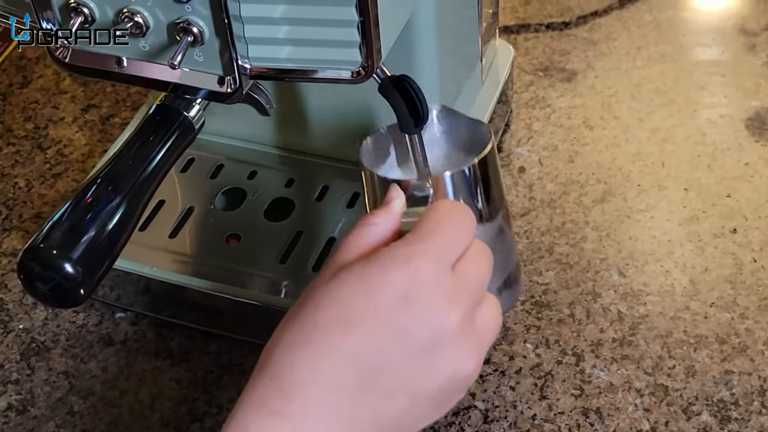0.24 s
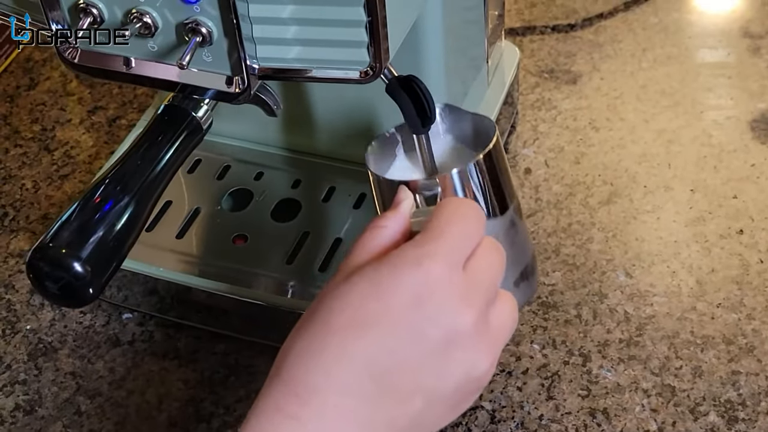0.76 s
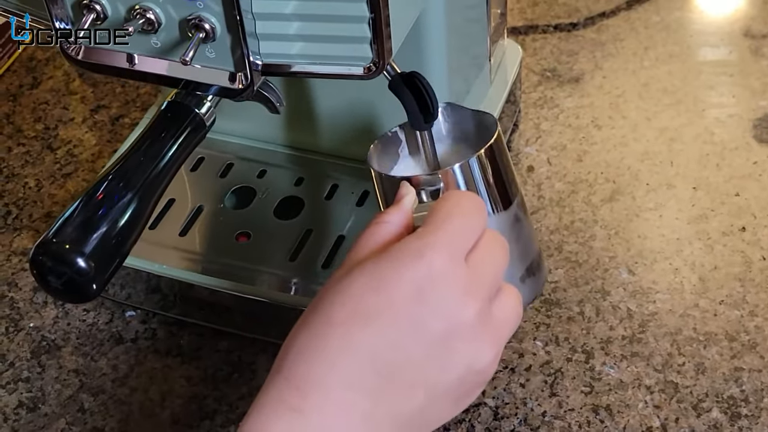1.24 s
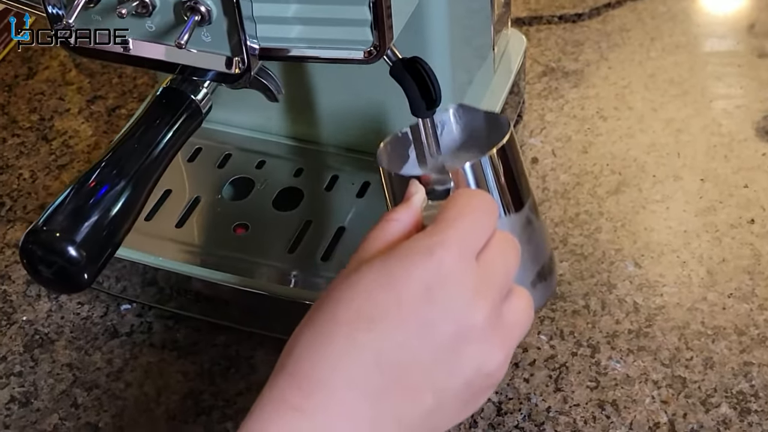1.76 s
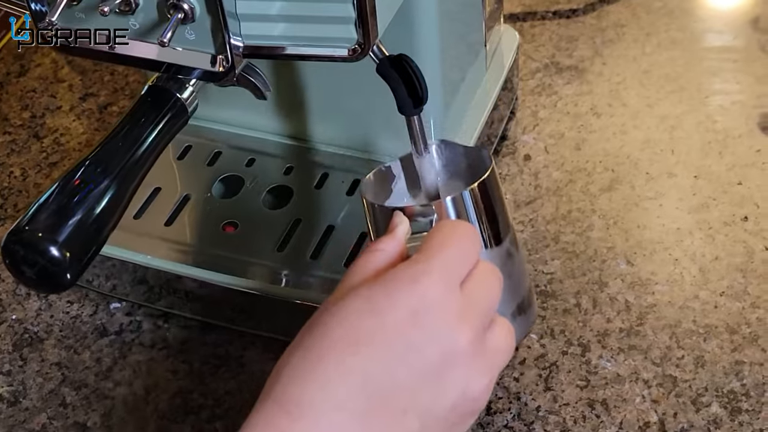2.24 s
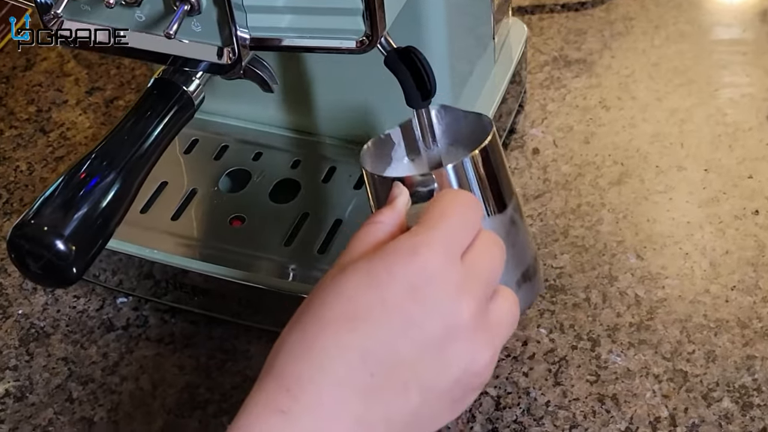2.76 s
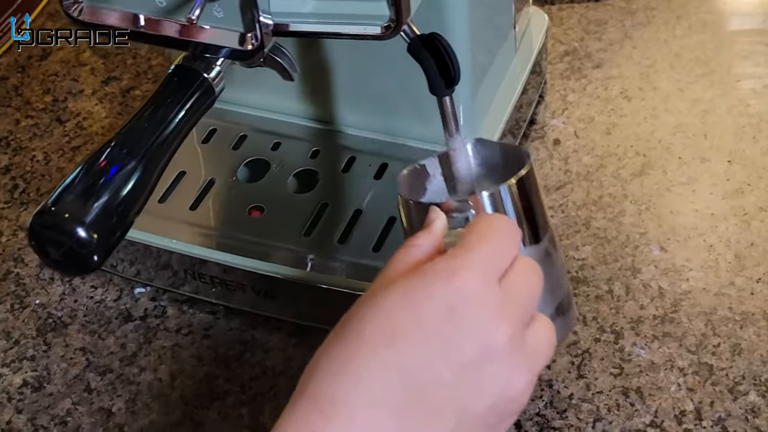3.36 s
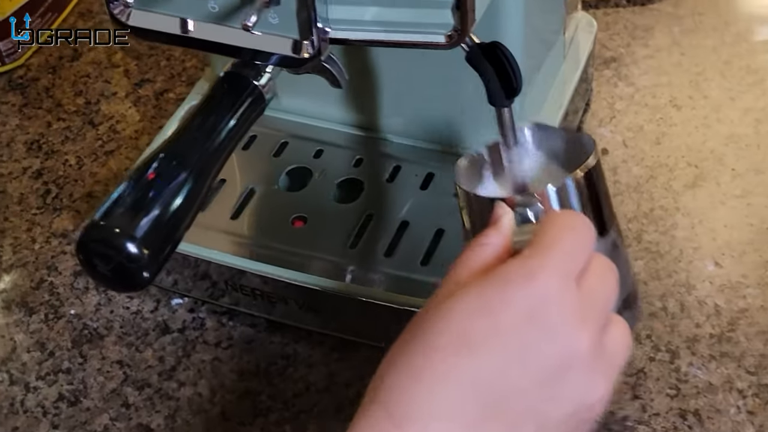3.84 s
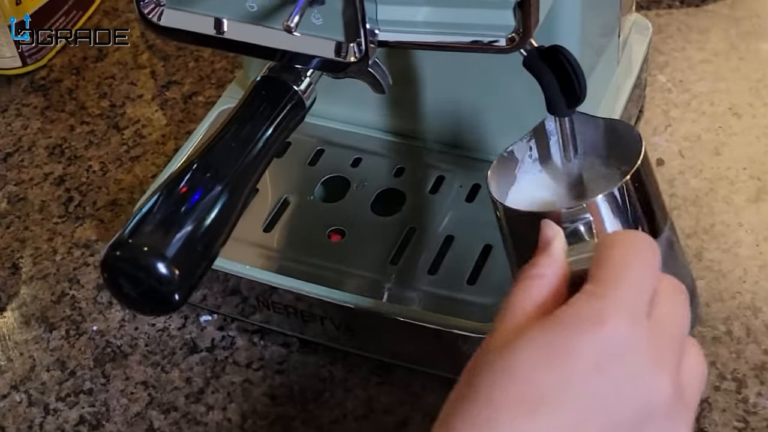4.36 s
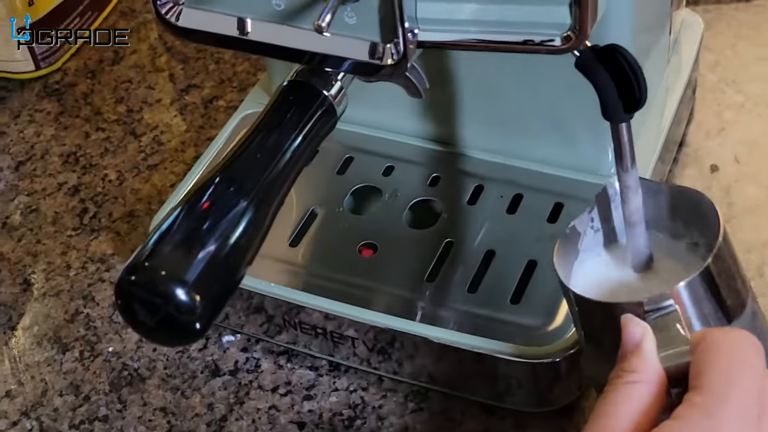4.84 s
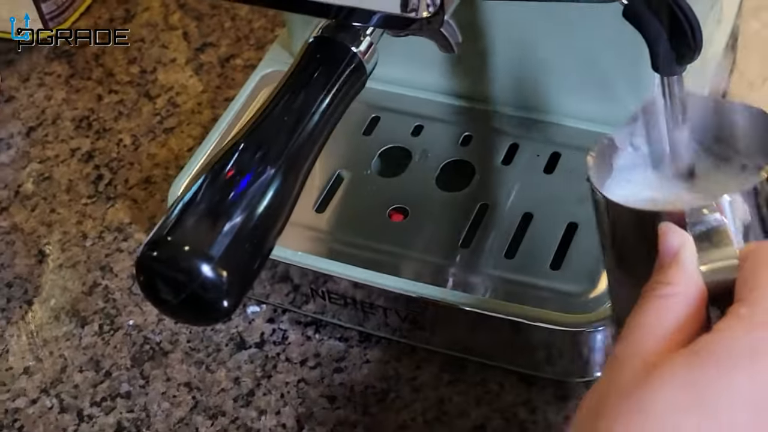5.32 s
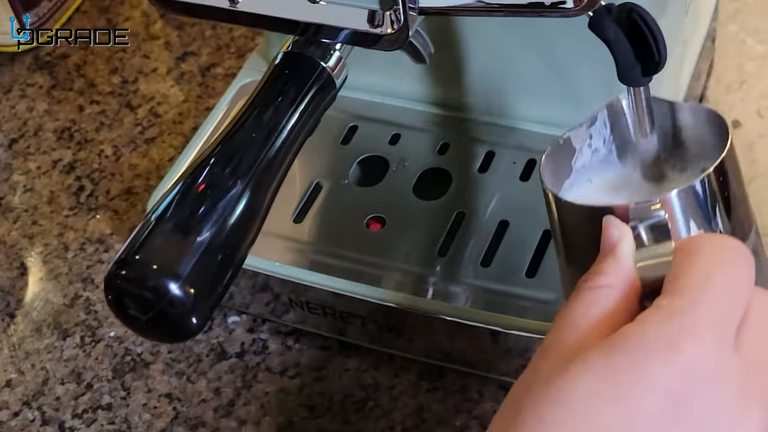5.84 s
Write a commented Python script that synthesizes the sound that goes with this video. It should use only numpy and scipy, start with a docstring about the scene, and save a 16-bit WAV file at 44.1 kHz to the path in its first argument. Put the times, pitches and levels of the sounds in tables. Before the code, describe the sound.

Close, rough squealing and fizzing of steam heating milk in steel, with regular low pump burrs, a late bright airy spurt and bubbling, rising gurgles.

```python
"""Close to a stereo microphone on a kitchen counter, a steam wand heats milk in a steel pitcher.
From the start, collapsing steam bubbles ring the pitcher (squeal) and hiss as coloured noise (fizz).
A hum (a sine) lies beneath; the pump burrs every three quarters of a second, and struck modes make knocks.
Near the end the tip comes out of the milk: jet noise in bright puffs, with a sputter from the surface.
Then it dips back and gurgles in the froth: swooping resonances, rising bubbles and climbing tones."""
import sys
import numpy as np
from scipy import signal
from scipy.fft import rfft, irfft
from scipy.io import wavfile

SR = 44100
rng = np.random.default_rng(int(sys.argv[2]) if len(sys.argv) > 2 else 0)


def transcribe(signal):
    """Save signal, clipped to [-1, 1], as a 16-bit WAV file at the path in sys.argv[1]."""
    frames = np.atleast_2d(signal).T
    limited = np.clip(frames, -1, 1)
    pcm = np.round(limited * 32767).astype(np.int16)
    wavfile.write(sys.argv[1], SR, pcm)


N = 268392
TIME = np.arange(N) / SR  # s
FRAME, HOP = 2048, 512  # samples
HZ = np.fft.rfftfreq(FRAME, 1 / SR)
FRAME_TIME = np.arange(-(-N // HOP) + 1) * HOP / SR  # s


def squeal():
    """Steam bubbles collapse in the milk and ring the pitcher's resonances."""
    # how each layer answers the tip: level_db, warming_db_per_s, lowered_db, shallow_db, deep_db
    # rows: lower squeal, upper squeal, lower overtones, upper overtones, churning, lowest ring
    squeal_response = [ (-17, -1.28, -1.5, -4, 8), (-24.5, 2.5, -6, -3.8, 1.1), (-32.5, -1, 6.5, 5.5, -1),
                       (-27.5, 0.5, -7, -15.5, 0.3), (-42, -9.5, -3, 9.5, -28), (-37, -4, -3, -2, 1), ]
    # resonances of the filled pitcher: pitch_hz, width_hz, relative_level_db
    lowest_ring = [(850.3, 20.4, 0)]
    lower_modes = [(1458, 72, -5.5), (1577, 96, 0.5), (1673.4, 35.6, 5), (1795, 13.7, 3.5)]  # pitch before tuning
    upper_modes = [(1836, 145, -8.5), (1949, 49, -2), (2048, 27, 4), (2096, 13, 3), (2160, 32, -1),
                   (2256, 37, -10.5)]  # pitch before tuning
    lower_overtone_modes = [(2500, 260, -5), (2787, 46, 2), (2926, 49, 9), (3190, 59, -4.5),
                            (3150, 50, -1.5)]
    upper_overtone_modes = [(3418, 71, 1.5), (3567, 114, -8), (3738, 64, -1.5), (3875, 125, -7.5),
                            (4254, 240, -14.5)]
    # spectrum of the churning milk: frequency_hz, relative_density_db
    churn_colour = [(400, -14.5), (750, -14), (900, 12), (1050, 9), (1300, -16), (1700, -43), (3000, -60)]

    lower, upper, lower_overtones, upper_overtones, churn, lowest = submerged(squeal_response)
    tuning = 0.999 + 0.0028 * FRAME_TIME[:, None]  # pitch factor, rises a little as the milk warms
    drive = collapses(per_s=60, decay_s=0.0055, depth=0.21)
    out = lower * turbulence(resonances(lower_modes, tuning), drive)
    out += upper * turbulence(resonances(upper_modes, tuning), drive)
    out += lower_overtones * turbulence(resonances(lower_overtone_modes), drive)
    out += upper_overtones * turbulence(resonances(upper_overtone_modes), drive, patchy_db=3.5)
    out += lowest * turbulence(resonances(lowest_ring), drive)
    return out + flares(drive) + churn * turbulence(spectrum(churn_colour), drive)


def flares(drive):
    """Now and then one resonance of the pitcher catches and swells above the rest."""
    # flaring resonances: middle_s, length_s, pitch_hz, level_db
    flare_table = [(.08, 0.25, 856, -32.5), (0.196, 0.17, 1660, -18), (0.296, 0.16, 845, -33),
                   (0.507, 0.76, 5970, -32), (0.644, 0.18, 7500, -27), (0.766, 0.095, 8500, -26),
                   (0.776, 0.13, 1657, -15), (1.33, 0.13, 847, -29.5), (1.367, 0.3, 8200, -30.5),
                   (1.394, 0.14, 2930, -26.5), (1.416, 0.12, 1660, -18), (1.516, 0.26, 2000, -21),
                   (1.76, .22, 2044, -15.5), (2.04, 0.62, 867, -40.5), (2.182, 0.15, 2095, -16),
                   (2.7, 0.42, 8660, -31.5), (2.757, 0.76, 837, -36), (2.982, 0.39, 3440, -23.5),
                   (3.318, 0.27, 843, -35), (3.68, 0.29, 2074, -18), (3.826, 0.5, 855, -42),
                   (4.346, .22, 3440, -26), (4.446, 0.38, 836, -41.5), (4.502, 0.4, 3225, -25),
                   (4.645, 0.36, 2930, -24.5), (4.716, 0.19, 837, -39), (4.777, 0.49, 6460, -28)]
    width_share = 0.035  # width of a resonance as a share of its frequency
    colour, power = 1e-15, 0
    for middle, length, hz, db in flare_table:
        shape = amp(db + resonances([(hz, width_share * hz, 0)]))
        swelling = shape * swell(FRAME_TIME[:, None], middle, length)
        colour += swelling ** 2 / hz  # evens out the wider resonances of high pitches
        power += (amp(db) * swell(TIME, middle, length)) ** 2
    return np.sqrt(power) * turbulence(10 * np.log10(colour), drive)


def steam():
    """The smallest bubbles fizz and spit over the steady hiss of the nozzle."""
    # how each layer answers the tip: level_db, warming_db_per_s, lowered_db, shallow_db, deep_db
    # rows: fizz, nozzle hiss, shrill ring, ring of the deep tip
    steam_response = [ (-27.5, .4, -2.5, 2.2, 3.5), (-36, 1.31, -.5, 7.5, 3), (-33.5, 0.56, -23, -23, 2.5),
                      (-43.5, -1.5, -11, -10, 24.5), ]
    # spectra: frequency_hz, relative_density_db
    fizz_colour = [(600, -71), (1400, -36), (2500, -10.5), (4000, 0), (4900, 3), (5600, 0.5), (6400, 1.5),
                   (7700, 3.5), (8400, 1.5), (9300, -3.5), (10300, -2), (12000, -8.5), (16000, -8)]
    nozzle_colour = [(3000, -46), (8000, -4.5), (10500, 1), (12500, 5), (13700, 6), (15600, 3)]
    # rings of the smallest bubbles and of the deep tip: pitch_hz, width_hz, relative_level_db
    shrill_ring = [(7000, 370, 0)]
    deep_ring = [(4940, 440, 0)]

    fizz, hiss, shrill, deep = submerged(steam_response)
    drive = collapses(per_s=26, decay_s=0.014, depth=0.52)
    drive = drive * collapses(per_s=430, decay_s=0.00015, depth=0.62)
    out = fizz * turbulence(spectrum(fizz_colour), drive, patchy_db=1.8)
    out += hiss * turbulence(spectrum(nozzle_colour), drive, patchy_db=1.1)
    out += shrill * turbulence(resonances(shrill_ring), drive)
    return out + deep * turbulence(resonances(deep_ring), drive)


def submerged(responses):
    """Gain of each layer while the tip is under the milk: it follows the warmth and the depth of the tip."""
    # the hand bobs the pitcher: middle_s, length_s, tip_depth (about -1 shallow to 1 deep, no unit)
    bobs = [(0.224, 0.38, -0.98), (0.79, 0.29, -1.16), (1.356, 0.25, -0.52), (1.608, 0.37, 0.45),
            (1.963, 0.36, -0.29), (2.27, .23, 0.76), (2.41, 0.27, -0.2), (2.764, 0.13, 0.47),
            (2.972, 0.75, 0.31), (3.215, 0.14, -0.9), (3.377, 0.52, 0.66), (3.543, 0.23, -0.64),
            (3.976, 0.13, 0.8), (4.103, 0.42, -0.42), (4.426, 0.43, 0.42), (4.66, 0.15, 0.23)]
    lowering_s, surfacing_s, fade_s = 3.2, 4.89, 0.041  # slowly lowered until the tip comes out
    wander_db = 1.3  # rms; the swirling milk sways every layer

    t = FRAME_TIME
    depth = sum(size * swell(t, middle, length) for middle, length, size in bobs)
    shallow, deep = np.maximum(-depth, 0), np.maximum(depth, 0)
    lowered = np.clip((t - lowering_s) / (surfacing_s - lowering_s), 0, 1)
    under = np.exp(-np.maximum(t - surfacing_s, 0) / fade_s)
    gains = []
    for db, warming_db, lowered_db, shallow_db, deep_db in responses:
        steered = db + warming_db * t + lowered_db * lowered
        steered = steered + shallow_db * shallow + deep_db * deep
        swayed = steered + wander_db * drift(t.shape, 2.8)
        gains.append(np.interp(TIME, t, under * amp(swayed)))
    return gains


def free_jet():
    """Out of the milk the jet hisses brightly and blows a sputtering hollow in the surface."""
    # puffs into the air: start_s, attack_s, length_s, level_db
    jet_blasts = [(4.901, 0.054, 0.12, -19.5), (5.037, 0.033, .062, -17.5), (5.1, .01, .13, -39),
                  (5.184, .003, 0.011, -19)]
    # the jet digs into the milk: start_s, length_s, hollow_level_db, sputter_level_db
    splashes = [(4.97, 0.085, -46.5, -38.5), (5.041, 0.068, -43, -33), (5.126, 0.063, -31.5, -26),
                (5.193, 0.075, -47.5, -37.5)]
    # spectrum of the jet: frequency_hz, relative_density_db
    jet_colour = [(800, -24.5), (2400, -21.5), (3400, 0), (4300, -11), (5200, -13.5), (6200, -5),
                  (8500, -8.5), (11000, -4.5), (12000, -7), (13700, 1.5), (14400, -4), (15400, -0.5),
                  (16000, -23)]
    # resonances of the hollow and of the sputter: pitch_hz, width_hz, relative_level_db
    hollow_modes = [(367, 240, -5), (458, 76, 1), (650, 72, -12)]
    sputter_modes = [(1130, 110, -4.5), (1520, 240, 1), (1810, 310, -5), (2130, 160, -16)]

    jet = sum(amp(db) * blast(start, attack, length) for start, attack, length, db in jet_blasts)
    hollow, sputter = np.zeros(N), np.zeros(N)
    for start, length, hollow_db, sputter_db in splashes:
        puff = blast(start, 0.023, length)
        hollow += amp(hollow_db) * puff
        sputter += amp(sputter_db) * puff
    drive = collapses(per_s=96, decay_s=0.003, depth=1.0)
    out = jet * turbulence(spectrum(jet_colour), drive, patchy_db=3)
    out += hollow * turbulence(resonances(hollow_modes), drive)
    return out + sputter * turbulence(resonances(sputter_modes), drive, patchy_db=4)


def froth():
    """Back in the froth the tip gurgles, rasps and fizzes, and a set of rings climbs as it sinks deeper."""
    # levels before the trims below: time_s, rasp_db, fizz_db
    froth_levels = [(5.27, -40, -39), (5.312, -28, -42.5), (5.488, -25, -42), (5.504, -19, -36.5),
                    (5.552, -29, -46), (5.8, -31, -46), (5.844, -25, -44), (6.02, -32.5, -34.5),
                    (6.08, -24, -36.5)]
    # the tip gulps: start_s, attack_s, length_s, level_db
    gulps = [(5.26, .005, .2, -25), (5.468, 0.031, 0.35, -30.5), (5.803, 0.042, 0.15, -24.5),
             (5.949, .004, 0.079, -17), (6.03, .03, 0.068, -25)]
    # the resonances swoop as the pitcher is moved: time_s, pitch_factor (no unit)
    froth_tuning = [(5.26, 1.07), (5.34, 1.11), (5.47, 1.01), (5.56, 0.89), (5.72, 1), (5.9, 0.97),
                    (5.96, 1.09), (6.09, 0.96)]
    # resonances before tuning: pitch_hz, width_hz, relative_level_db
    gurgle_modes = [(1140, 95, -10), (1470, 79, 5), (1650, 90, 4.5), (2090, 210, -6)]
    rasp_modes = [(2160, 100, -9), (2420, 70, 12.5), (2690, 250, 9), (3050, 420, 8.5), (3940, 710, -3)]
    # spectrum of the fizz: frequency_hz, relative_density_db
    froth_colour = [(900, -34), (2000, -7), (4600, 4.5), (6000, 5), (7500, 1.5), (9000, -2.5),
                    (12000, -5.5), (13700, -2), (15600, -9)]
    # main ring as the pitcher is lifted: time_s, pitch_hz, level_db
    glide = [(5.48, 778, -65), (5.54, 796, -48.5), (5.719, 817, -40), (5.822, 918, -41), (5.93, 1063, -38),
             (6.0, 1124, -25.5), (6.061, 1172, -21.5), (6.09, 1245, -33)]

    rasp, fizz = levels(froth_levels)
    gurgle = sum(amp(db) * blast(start, attack, length) for start, attack, length, db in gulps)
    tuning = follow(froth_tuning)[0]
    drive = collapses(per_s=80, decay_s=0.0041, depth=1.3)
    gurgling = turbulence(resonances(gurgle_modes, tuning), drive, patchy_db=3.5)
    gurgling = gurgling + .45 * bubbles(1350, 2050, count=350)
    rasping = turbulence(resonances(rasp_modes, tuning), drive, patchy_db=4.5)
    rasping = rasping + .5 * bubbles(2100, 3500, count=350)
    fizzing = turbulence(spectrum(froth_colour), drive, patchy_db=3.5)
    out = gurgle * gurgling + amp(0.5) * rasp * rasping + amp(7.5) * fizz * fizzing

    s, hz, db = np.transpose(glide)
    pitch, level = np.interp(TIME, s, hz), levels(np.c_[s, db])[0]
    out += level * (whistle(pitch) + amp(-2.5) * whistle(1.37 * pitch))
    return out + amp(-36) * np.sqrt(level) * whistle(.585 * pitch)  # the lowest ring swells less


def bubbles(low_hz, high_hz, count):
    """Bubbles in the froth ring briefly, each rising in pitch as it nears the surface."""
    out, t = np.zeros((2, N)), TIME[:SR // 15]
    for when, pitch, size, place in rng.random((count, 4)):
        hz = low_hz * (high_hz / low_hz) ** pitch
        envelope = amp(12 * size) * (np.exp(-t / .016) - np.exp(-t / .002))
        blip = envelope * np.exp(2j * np.pi * hz * t * (1 + .9 * t))
        add(out[0], when * TIME[-1], blip.real)
        add(out[1], when * TIME[-1], (blip * np.exp(2j * (place - .5))).real)  # phase places it
    return evened(out)


def squeaks():
    """Single pockets of steam oscillate for a moment."""
    # brief squeals: start_s, length_s, pitch_hz, level_db
    squeak_table = [(0.877, 0.0055, 1640, -12), (2.25, 0.025, 1600, -15), (4.691, 0.17, 2157, -18.5),
                    (4.898, 0.073, 3320, -20.5), (5.046, 0.015, 1170, -28.5), (5.263, 0.024, 1597, -26),
                    (5.381, 0.044, 1130, -37), (5.445, 0.04, 4180, -25.5), (5.47, 0.048, 2755, -25),
                    (5.825, 0.078, 3230, -23), (5.949, 0.0094, 1484, -8)]
    out = np.zeros(N)
    for s, length, hz, db in squeak_table:
        count = int(length * SR)
        tone = whistle(np.full(count, float(hz)))
        add(out, s, amp(db) * tone * signal.windows.tukey(count, .4))
    return out


def knocks():
    """The hand-held pitcher is bumped against the wand; hand and milk damp its ring."""
    # dull knocks: start_s, peak_db, brightness_db_per_octave
    knock_table = [(0.803, -33, -3), (0.873, -30, -3), (2.207, -30.5, -4.5), (2.798, -11, 7.5),
                   (2.82, -20.5, -3.5), (4.494, -25.5, 0), (4.831, -32, -6), (5.186, -23.5, 3)]
    # modes of the pitcher: pitch_hz, level_db (before brightness), t60_s
    knock_modes = [(173, 1, 0.15), (233, 6.5, 0.09), (324, 3, 0.13), (408, -18, .08), (540, 0.5, 0.14),
                   (685, 3, 0.071), (697, -4, 0.17), (873, 5.5, 0.056), (947, 5, 0.04), (1057, 5.5, 0.073),
                   (1110, -15, .05)]
    out = np.zeros(N)
    for s, db, tilt_db in knock_table:
        add(out, s, amp(db) * ring(knock_modes, tilt_db))
    return out


def machine():
    """The pump's piston pushes the casing once a mains cycle, in short bursts; a low hum goes on."""
    # modes of the casing: pitch_hz, relative_level_db, t60_s
    pump_modes = [(156, -7.5, 0.099), (199.4, -4.5, 0.1), (244, -6.5, 0.099), (290.4, -5.5, 0.089),
                  (360, 2, 0.017), (495, -12, 0.047), (544, -8, 0.051)]
    # the piston starts up and coasts down, one value a stroke: relative_level_db
    pump_strokes_db = [-9.5, -1, -1, -3, -14, -16.5]
    first_s, period_s, pump_db = .381, .748, -24.5
    mains_hz, hum_hz, jitter_s = 60, 59.3, 0.00164

    out, push = np.zeros(N), ring(pump_modes, attack_s=0.0039)
    for start in np.arange(first_s, TIME[-1], period_s):
        for stroke, db in enumerate(pump_strokes_db):
            # no two strokes ring quite alike
            rattle = 0.62 * push + 0.8 * ring(pump_modes, attack_s=0.015)
            when = start + stroke / mains_hz + jitter_s * rng.standard_normal()
            add(out, when, amp(pump_db + db) * rattle)
    return out + amp(-55.5) * np.sqrt(2) * np.sin(2 * np.pi * hum_hz * TIME)


def room():
    """The low rumble of the kitchen, as steady coloured noise."""
    # spectrum of the room: frequency_hz, relative_density_db
    room_colour = [(15, -16), (35, -6), (50, -4), (73, 9), (88, -3.5), (120, -7.5), (170, -13), (300, -15),
                   (700, -22.5), (2000, -47), (16000, -50)]
    return amp(-50.5) * turbulence(spectrum(room_colour))


def kitchen(x, wet_db, t60):
    """Adds a short tail of sparse reflections, different in each channel."""
    t = TIME[:SR // 2]
    sparse = rng.random((2, len(t))) < 2000 / SR
    tail = rng.standard_normal((2, len(t))) * sparse * amp(-60 * t / t60) * (t > .003)
    wet = signal.fftconvolve(x[None], tail / np.linalg.norm(tail[0]), axes=1)[:, :N]
    return x + amp(wet_db) * wet


def turbulence(colour_db, drive=1, patchy_db=0):
    """Driven noise in a colour; shifting reflections ripple it finely and the swirling milk in patches."""
    # likeness of the two microphone channels: frequency_hz, likeness (0 to 1, no unit)
    likeness = [(60, .96), (300, .94), (800, .82), (1500, .74), (2100, .62), (3200, .38), (5000, .12),
                (8000, .08), (15000, .03)]
    # depth of the reflections' comb: frequency_hz, depth_db
    ripple_depth = [(1000, 2), (2200, 1.8), (3200, 3.6), (16000, 3.3)]
    # delay of the left channel as the pitcher moves to the right: time_s, delay_samples
    left_lag = [(0, 0), (3.2, 0), (4.2, 1.8), (4.8, 3), (5.3, 3), (5.8, 2)]

    noise = rng.standard_normal((2, N)) * drive
    z = signal.stft(noise, nperseg=FRAME, noverlap=FRAME - HOP)[2].transpose(0, 2, 1)
    patches = drift(z.shape[1:], 7, 18)  # frames, bins
    ripples = drift(z.shape, 0, 15, 3.2)  # channels, frames, bins
    gain = amp(colour_db + patchy_db * patches + spectrum(ripple_depth) * ripples)
    # each frame's gain is evened, so that colour leaves the level alone
    mid, side = z * gain / np.linalg.norm(gain, axis=2, keepdims=True)
    same = np.clip(spectrum(likeness), 0, 1)
    side = side * np.sqrt((1 - same) / (1 + same))
    left = (mid + side) * np.exp(-2j * np.pi * HZ * follow(left_lag)[0] / SR)
    stereo = np.array([left, mid - side]).transpose(0, 2, 1)
    x = signal.istft(stereo, nperseg=FRAME, noverlap=FRAME - HOP)[1][:, :N]
    return x / np.std(x.mean(0))


def collapses(per_s, decay_s, depth):
    """Envelope of bubble clouds that implode at once and die away."""
    kicks = (rng.random(N) < per_s / SR) * rng.uniform(.3, 1.7, N)
    dying = signal.lfilter([1], [1, -np.exp(-1 / (decay_s * SR))], kicks)
    return np.sqrt(1 + depth * dying)


def whistle(hz):
    """A tone whose pitch and strength are shaken by the bubbles."""
    shaken = hz + .9 * np.sqrt(hz) * drift(hz.shape, 200)
    flutter = amp(3 * drift(hz.shape, 450) - 1)
    return np.sqrt(2) * flutter * np.sin(2 * np.pi * np.cumsum(shaken) / SR)


def ring(modes, tilt_db=0, attack_s=0.00043):
    """A struck body's dying modes, peak 1."""
    t, x = TIME[:SR // 3], 0
    for hz, db, t60 in modes:
        decay = amp(db + tilt_db * np.log2(hz) - 60 * t / t60)
        x = x + decay * np.sin(2 * np.pi * (hz * t + rng.random()))
    x = x * (1 - np.exp(-t / attack_s))
    return x / abs(x).max()


def blast(start, attack, length):
    """Envelope of a puff of steam: attack, hold, release."""
    release = np.exp(-np.maximum(TIME - start - length, 0) / 0.016)
    return np.clip((TIME - start) / attack, 0, 1) * release


def swell(t, middle, length):
    """A smooth rise and fall, peak 1."""
    return np.cos(np.pi * np.clip((t - middle) / length, -.5, .5)) ** 2


def resonances(modes, tuning=1):
    """Spectrum in dB of steep-sided resonances, their pitch scaled by tuning."""
    power = 0
    for hz, width, db in modes:
        power = power + amp(db) ** 2 / (1 + 2 * ((HZ - hz * tuning) / width) ** 2) ** 2
    return 10 * np.log10(power)


def spectrum(points):
    """Joins (Hz, value) points on a log-frequency axis."""
    hz, value = np.transpose(points)
    return np.interp(np.log(HZ + 1), np.log(hz + 1), value)


def drift(shape, *spans):
    """Smooth random field of rms 1, alike over the given span of steps along each axis."""
    field = rng.standard_normal(shape)
    for axis, span in enumerate(spans):
        along = np.moveaxis(field, axis, -1)
        blur = np.exp(-(np.pi * span * np.fft.rfftfreq(shape[axis])) ** 2 / 2)
        field = np.moveaxis(irfft(rfft(along) * blur, shape[axis]), -1, axis)
    return evened(field)


def levels(table):
    """One gain curve for each dB column, fading out beyond the table's ends."""
    s, *columns = np.transpose(table)
    outside = np.maximum(np.maximum(s[0] - TIME, TIME - s[-1]), 0)
    return [amp(np.interp(TIME, s, db)) * np.exp(-outside / 0.019) for db in columns]


def follow(table):
    """Each column of a time table, read once a frame."""
    s, *columns = np.transpose(table)
    return [np.interp(FRAME_TIME, s, column)[:, None] for column in columns]


def add(mix, s, sound):
    """Mixes a sound in at time s."""
    part = mix[max(round(s * SR), 0):][:len(sound)]
    part += sound[:len(part)]


def amp(db):
    """Decibels to gain."""
    return 10 ** (np.asarray(db) / 20)


def evened(x):
    """Scales to rms 1."""
    return x / np.sqrt(np.mean(x ** 2) + 1e-20)


def scene():
    """Steam and milk close in front, the machine and the room beneath."""
    milk = squeal() + steam() + free_jet() + froth()
    milk = milk + kitchen(squeaks(), wet_db=-3.5, t60=0.18)
    return milk + kitchen(machine() + knocks(), wet_db=-11.0, t60=0.2) + room()


def record(dry):
    """Peaks are rounded off near full scale; then the band is limited."""
    limited = dry / (1 + dry ** 8) ** (1 / 8)
    edge_hz = 15850
    lowpass = signal.firwin(401, edge_hz, window=("kaiser", 9), fs=SR)
    return signal.oaconvolve(limited, lowpass[None], "same")


dry = scene()
out = record(dry)
transcribe(out)
```